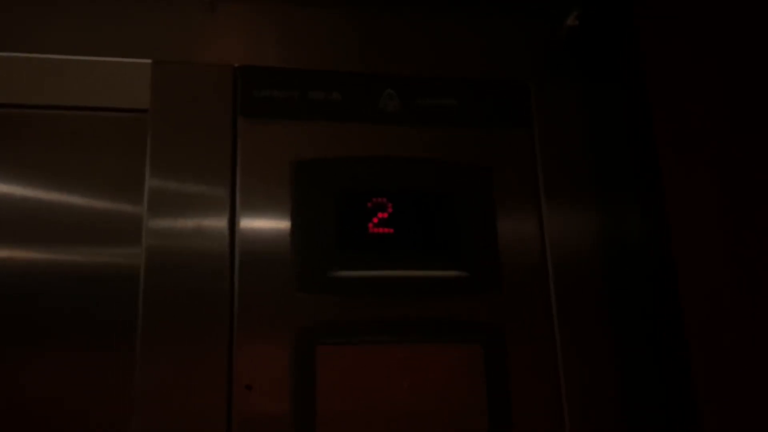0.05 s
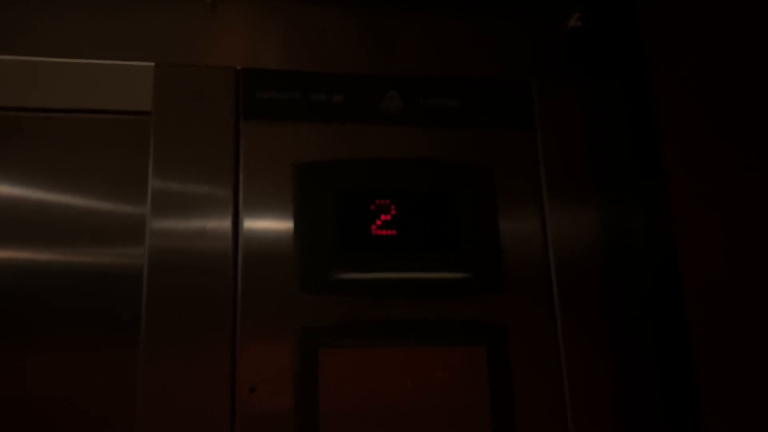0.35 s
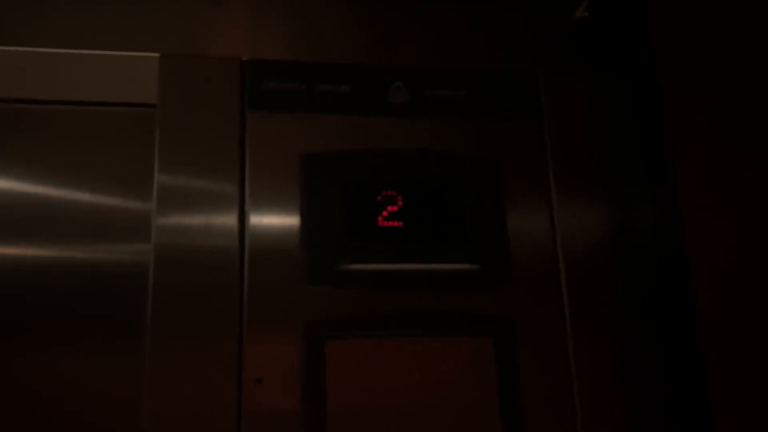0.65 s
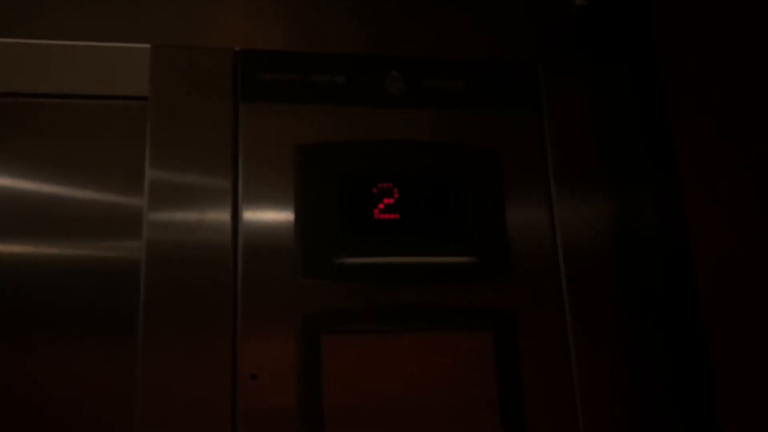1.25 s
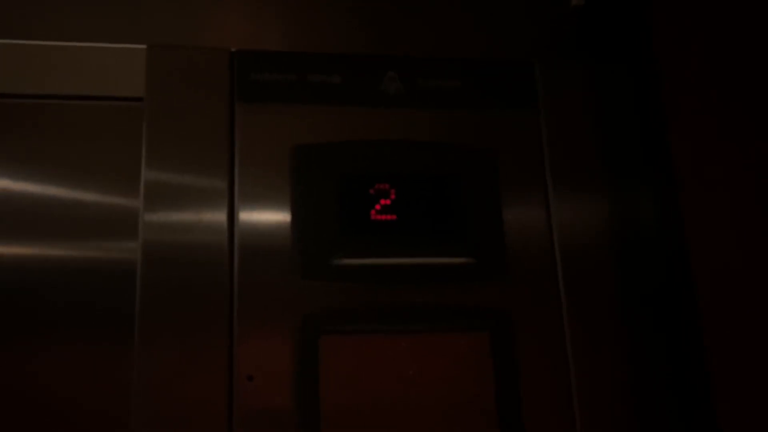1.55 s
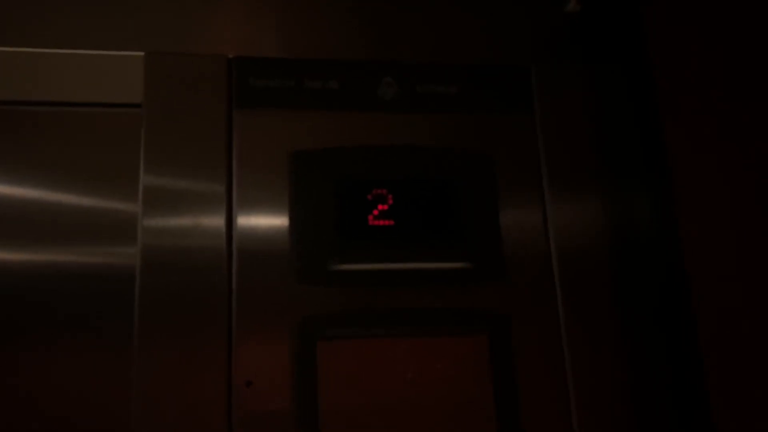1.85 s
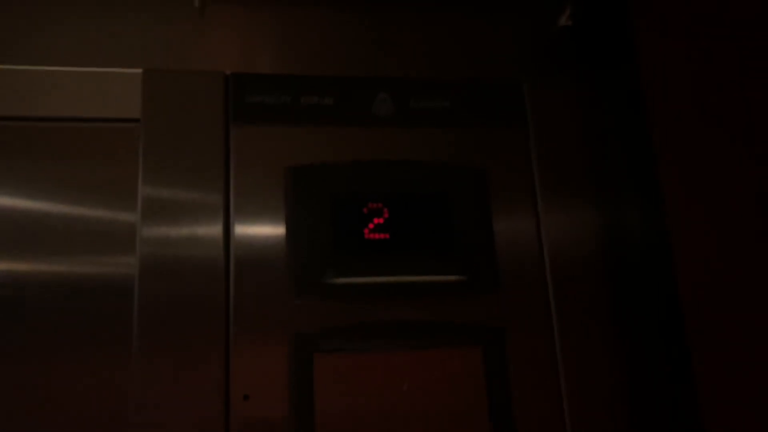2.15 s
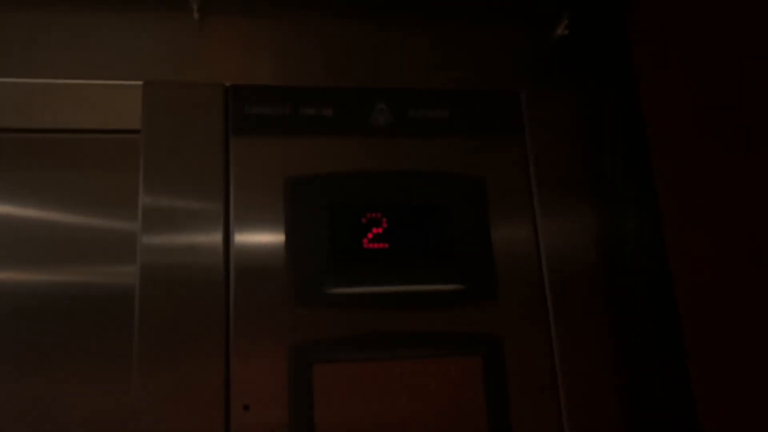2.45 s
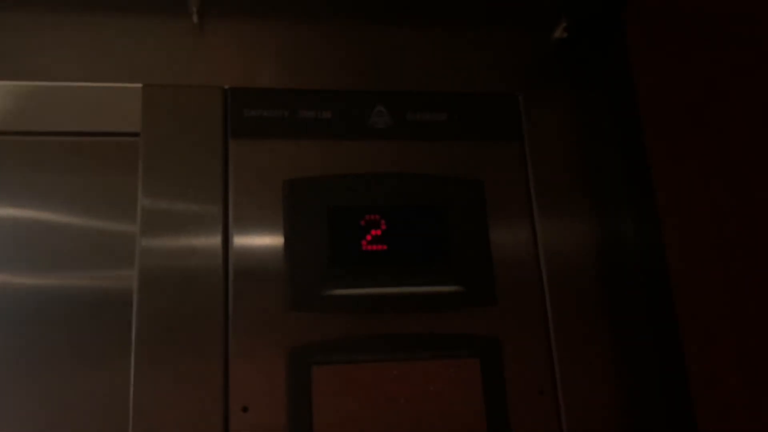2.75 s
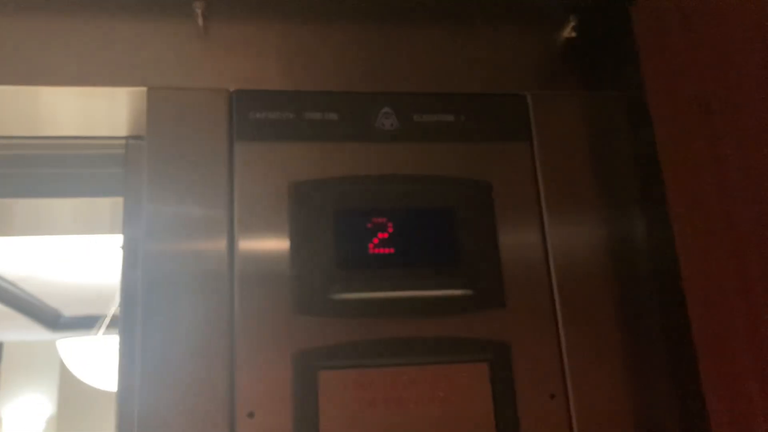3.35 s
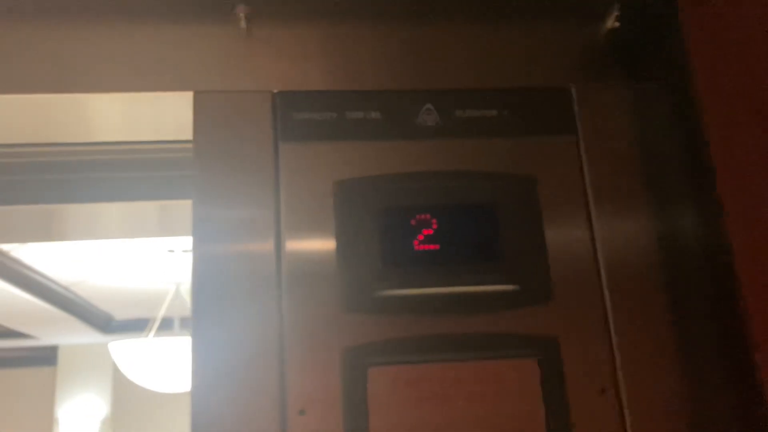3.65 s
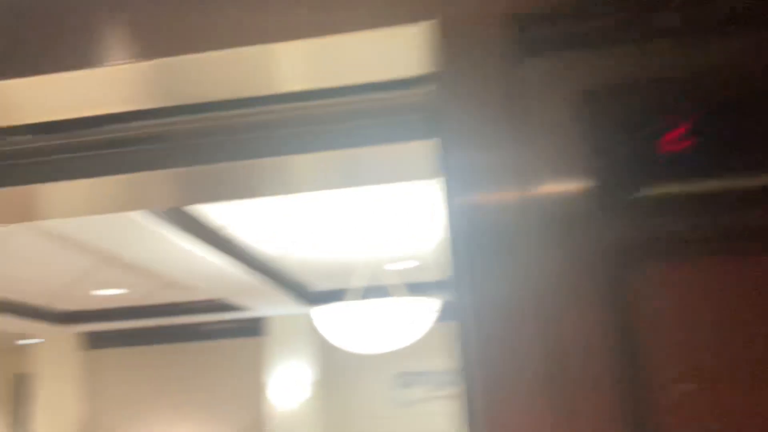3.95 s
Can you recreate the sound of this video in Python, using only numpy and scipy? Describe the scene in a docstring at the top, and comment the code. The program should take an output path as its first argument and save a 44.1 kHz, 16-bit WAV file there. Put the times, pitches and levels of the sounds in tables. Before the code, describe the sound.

An elevator door slides open, heard from inside a small steel cab. A fan drones throughout under a thin, high electronic whine. Around 1.5 seconds a low hum fades and the rollers start rumbling, followed by a squeak and a latch clunk near 1.9. From 2 seconds the motor whirrs up, then down, with hissing guides and small squeaks, ending in a low groan around 3.5.

```python
"""A fan drones close by, heard from a stereo microphone inside a small steel elevator cab.
Under it sits a thin, high electronic whine, and a mains hum dies away as the car settles.
The door drive starts, a squeak and a latch clunk follow, and the door rolls open:
its rollers rumble, its guides hiss and the drive whirrs up and down with the speed,
ending in a low groan. The steel walls add narrow resonances and spread the sound."""
import sys
import numpy as np
from scipy import signal
from scipy.fft import rfft, irfft
from scipy.io import wavfile
from scipy.ndimage import uniform_filter1d

SR = 44100
rng = np.random.default_rng(int(sys.argv[2]) if len(sys.argv) > 2 else 0)


def digitize_waveform(pressure):
    """Quantize a signal to 16-bit integers and store it at the path in sys.argv[1].

    Rows of a 2-D input are taken as channels; values are limited to [-1, 1].
    """
    field = np.atleast_2d(pressure).T
    bounded = np.clip(field, -1, 1)
    quanta = np.round(bounded * 32767).astype(np.int16)
    wavfile.write(sys.argv[1], SR, quanta)


N = 176400
T = np.arange(N) / SR
HZ = np.fft.rfftfreq(N, 1 / SR)


def amp(db):
    """Decibels to gain."""
    return 10 ** (np.asarray(db) / 20)


def unit(x):
    """Scales to rms 1."""
    return x / np.sqrt(np.mean(x ** 2) + 1e-20)


def curve(rows, column=1):
    """Reads a column of a time table at every sample."""
    rows = np.array(rows)
    return np.interp(T, rows[:, 0], rows[:, column])


def spectrum(rows):
    """Reads a frequency table on a log axis."""
    f, value = np.transpose(rows)
    return np.interp(np.log(HZ + 1), np.log(f + 1), value)


def wander(rate_hz):
    """Slow random drift of rms 1."""
    return unit(irfft(rfft(rng.standard_normal(N)) / (1 + (HZ / rate_hz) ** 4), N))


def burst(start, rise, t60):
    """An envelope with a linear rise and an exponential decay; times in seconds."""
    age = np.maximum(T - start, 0)
    return np.minimum(age / rise, 1) * amp(-60 * np.maximum(age - rise, 0) / t60)


def ripple(depth_db=2.5, width_hz=14, full_from_hz=534):
    """The steel cab's many narrow peaks and dips, as a gain by frequency."""
    peaks = np.interp(HZ / width_hz, np.arange(4096), rng.uniform(-1, 1, 4096))
    return amp(depth_db * unit(peaks) * np.minimum(HZ / full_from_hz, 1) ** 2)


def diffuse(gain, excitation=None):
    """Colours two random signals and blends them as the cab's reflections do at the microphone."""
    # how alike left and right are: f/Hz, likeness (a correlation once clipped to +-1)
    likeness = [(60, 0.5), (120, 1.45), (200, 0.8), (370, 0.84), (690, 0.58), (1270, 0), (4300, 0),
                (5500, -0.42), (7200, 0.87), (9200, -1.55), (11300, 1.54), (13500, -1)]
    correlation = np.clip(spectrum(likeness), -1, 1)
    a, b = rfft(rng.standard_normal((2, N)) if excitation is None else excitation)
    mid, side = a * np.sqrt(1 + correlation), b * np.sqrt(1 - correlation)
    return unit(irfft(np.array([mid + side, mid - side]) * gain, N))


def ring(hz, width_hz):
    """Noise in one steep resonance."""
    return diffuse(1 / (1 + ((HZ - hz) / (width_hz / 1.42)) ** 2))


def glide(rows, width_hz, multiple=1):
    """A rough tone that follows rows of t/s, f/Hz, level/dB."""
    band = rfft(rng.standard_normal((2, 2, N))) / (1 + (HZ / (width_hz / 2.4)) ** 2)
    a, b = irfft(band, N)
    phase = 2 * np.pi * np.cumsum(curve(rows) * multiple) / SR
    gate = uniform_filter1d(1. * ((T > rows[0][0]) & (T < rows[-1][0])), size=900)
    return unit(a * np.cos(phase) + b * np.sin(phase)) * amp(curve(rows, column=2)) * gate


def shimmer(x, patchy_db):
    """Narrow resonances come and go as the contact point moves."""
    frames = signal.stft(x, nperseg=1024, noverlap=768)[2]
    patches = rng.standard_normal(frames.shape[1:])
    patches = uniform_filter1d(uniform_filter1d(patches, size=4, axis=0), size=18, axis=1)
    frames *= amp(patchy_db * unit(patches))
    return unit(signal.istft(frames, nperseg=1024, noverlap=768)[1][:, :N])


def fan(waver_db=1.4, air_db=-35):
    """The cab's room tone: the fan's drone, the resonances it stirs, and its rush of air."""
    # the drone's strength: t/s, level/dB
    drone_level = [(0, -27), (.25, -22), (.85, -21), (1.17, -22), (1.3, -26.5), (1.85, -28), (2.3, -27.5),
                   (2.55, -21.5), (2.95, -27), (3.25, -24), (3.75, -27), (4, -38)]
    # the drone's pitch: t/s, f/Hz
    drone_pitch = [(0, 76.2), (1.5, 76.4), (1.9, 77.46), (4, 77)]
    # cab resonances: f/Hz, width/Hz, level/dB
    cab_rings = [(97.4, 13.4, -35.5), (122.4, 10.2, -34), (165.7, 9, -46.5), (192.4, 5.6, -46),
                 (238.4, 3.7, -48.5), (341.2, 11.8, -44.5), (400.7, 5.9, -52), (575, 7.6, -56),
                 (638, 10, -55.5), (943, 45, -67.5)]
    # moving air: f/Hz, relative level/dB
    air_colour = [(20, -10), (45, 5.5), (100, 4), (150, -5.5), (300, -3), (430, -4.5), (700, -10),
                  (1100, -13), (1800, -19), (2700, -22.5), (3800, -33), (5500, -41), (11500, -50.5),
                  (14000, -62.5)]
    phase = 2 * np.pi * np.cumsum(curve(drone_pitch)) / SR
    drone = np.sqrt(2) * np.sin(phase) * amp(curve(drone_level) + waver_db * wander(14))
    rings = sum(amp(db) * ring(hz, width) for hz, width, db in cab_rings)
    air = amp(air_db) * diffuse(amp(spectrum(air_colour)) * ripple())
    return drone + rings + air


def electrics(hum_hz=58, hum_db=-33, off_s=1.6, fade_s=0.24, whine_hz=15001, random_level_db=2.5):
    """Mains hum that dies as the car settles, and a thin, high electronic whine."""
    # electronic whine: t/s, level/dB
    whine_level = [(0, -61), (.58, -61), (.72, -71), (1.04, -65), (1.22, -70), (2.64, -72), (3.25, -63),
                   (4, -64)]
    fade = np.clip(1 - (T - off_s) / fade_s, 0, 1)
    hum = amp(hum_db) * fade * np.sin(2 * np.pi * hum_hz * T)
    lag_rad = np.array([[0], [1.15]])  # left, right
    whine = np.sin(2 * np.pi * whine_hz * T - lag_rad)
    whine *= amp(curve(whine_level) + random_level_db * wander(25))
    return np.sqrt(2) * (hum + whine)


def latch(puff_db=-56.5, bloom_cycles=9.2, thud_s=1.929, thud_hz=83.2, thud_db=-17):
    """A soft hiss, then the latch clacks, its low modes bloom and the door panel booms as it moves."""
    # the soft hiss: f/Hz, relative level/dB
    puff_colour = [(1000, -11), (5000, 3), (11500, 0), (14500, -12)]
    # latch blows: t/s, level/dB
    blows = [(1.849, -35.5), (1.861, -39.5), (1.876, -41)]
    # their clatter: f/Hz, relative level/dB
    clatter_colour = [(150, 2), (1500, -1), (3000, -2), (4900, -11), (5800, -21), (10800, -18.5),
                      (13000, -50)]
    # the modes they ring: f/Hz, level/dB relative to the blow, t60/s
    modes = [(194, 0, 0.81), (265, -1, 0.91), (623, 3.5, 0.34), (960, -3.5, 0.76), (1160, -6.5, 0.37),
             (1920, -10.5, 0.45), (2660, -15, 0.23), (3050, -11.5, 0.59), (4520, -8.5, 0.13)]

    def struck(rise, t60):
        """The envelope of all the blows, added in power."""
        return np.sqrt(sum((amp(db) * burst(start, rise, t60)) ** 2 for start, db in blows))

    puff = amp(puff_db) * burst(start=1.435, rise=0.019, t60=0.43) * diffuse(amp(spectrum(puff_colour)))
    clatter = diffuse(amp(spectrum(clatter_colour)) * ripple()) * struck(rise=0.0025, t60=0.37)
    body = sum(amp(db) * ring(hz, 0.05 * hz) * struck(bloom_cycles / hz, t60) for hz, db, t60 in modes)
    thud = amp(thud_db) * burst(thud_s, rise=0.04, t60=0.4) * np.sin(2 * np.pi * thud_hz * (T - thud_s))
    return puff + clatter + body + thud


def squeaks(rise_s=0.02, width_hz=160):
    """Dry metal parts chirp and ring on."""
    # squeaks: t/s, f/Hz, level/dB, t60/s, phase between left and right/rad
    chirps = [(1.742, 8620, -38.5, 0.27, 2.6), (2.328, 7130, -42.5, 0.36, 1.3), (2.92, 2010, -45, 0.25, 1),
              (2.98, 1740, -40.5, 0.3, 1)]
    out = np.zeros((2, N))
    for start, hz, db, t60, phase in chirps:
        tone = signal.hilbert(ring(hz, width_hz)[0])
        pair = np.array([tone, tone * np.exp(1j * phase)]).real
        out += amp(db) * burst(start, rise_s, t60) * pair
    return out


def rollers():
    """The door's rollers rumble along their track, a step from the microphone."""
    # the rumble's course: t/s, level/dB
    level = [(1.35, -53), (1.53, -36), (1.83, -48.5), (1.98, -35.5), (2.25, -37.5), (2.42, -45.5),
             (3.1, -51.5), (3.3, -55), (3.6, -45), (4, -50)]
    # its colour: f/Hz, relative level/dB
    colour = [(60, -32), (190, -1), (300, -6), (440, -2), (620, -4), (820, -17.5), (1500, -18), (3000, -30),
              (8000, -52)]
    return amp(curve(level)) * diffuse(amp(spectrum(colour)) * ripple())


def guides(grit_per_s=1000, grit_spread_db=5.5, grit_share=0.49, flutter_db=1.54):
    """The door's guides rub along a gritty track; a falling sweep follows as the door brakes."""
    # the rubbing's course: t/s, level/dB
    level = [(1.8, -64), (2, -57), (2.2, -49.5), (2.5, -49.5), (2.7, -54), (2.85, -48.5), (2.92, -40),
             (3.0, -40), (3.12, -40.5), (3.22, -46.5), (3.5, -47.5), (3.66, -48.5), (3.77, -57), (4, -54.5)]
    # its colour: f/Hz, relative level/dB
    colour = [(300, -30), (1300, 1), (2300, -3.5), (2720, 4), (3300, 1.5), (5100, 2), (7100, 0.5),
              (8200, -2), (12300, -13.5), (15500, -17)]
    # the last sweep: t/s, f/Hz, level/dB
    sweep = [(3.55, 5540, -56), (3.72, 4810, -54), (3.85, 3990, -51), (4, 3480, -69)]
    grit = (rng.random((2, N)) < grit_per_s / SR) * rng.choice([-1, 1], (2, N))
    grit = grit * amp(grit_spread_db * np.minimum(rng.exponential(1, (2, N)), 4))
    response = amp(spectrum(colour)) * ripple()
    friction = rng.standard_normal((2, N)) + grit_share * unit(grit)
    rub = shimmer(diffuse(response, friction), patchy_db=3.5)
    envelope = amp(curve(level) + flutter_db * wander(13)) * (T > level[0][0])
    return rub * envelope + glide(sweep, width_hz=1300)


def drive(width_hz=240, overtone_ratio=2.07, overtone_db=-12, rough_db=2.0, groan_blend=0.54):
    """The door's motor and belt whirr with an overtone, rising, falling and ending in a groan."""
    # the whirr speeding up: t/s, f/Hz, level/dB
    rising = [(1.95, 2160, -62), (2.14, 2271, -54), (2.2, 2307, -47), (2.33, 2486, -53), (2.42, 2753, -45),
              (2.52, 2950, -40), (2.6, 3070, -42.5), (2.67, 3170, -51), (2.76, 3300, -64)]
    # the whirr slowing down: t/s, f/Hz, level/dB
    falling = [(2.728, 2100, -70), (2.81, 1995, -43.5), (2.88, 2002, -57.5), (2.941, 1995, -51.5),
               (3.01, 1730, -55.5), (3.15, 1435, -51), (3.319, 1262, -50.5), (3.45, 1087, -65)]
    # the low groan as the door brakes: t/s, f/Hz, level/dB
    braking = [(3.28, 637.6, -60), (3.39, 610, -40.5), (3.48, 595, -41), (3.62, 567.6, -50.5),
               (3.85, 511, -45)]
    whirr = np.zeros((2, N))
    for run in (rising, falling):
        whirr += glide(run, width_hz) + amp(overtone_db) * glide(run, 3 * width_hz, overtone_ratio)
    whirr *= amp(rough_db * wander(25))
    whirr = irfft(rfft(whirr) * ripple(), N)
    groan = glide(braking, width_hz=106)
    return whirr + groan + groan_blend * groan[::-1]  # each side also hears the other's groan


def panels(width_hz=40, swell_s=0.068):
    """The steel panels around the microphone sing along as the drive starts and brakes."""
    # swelling panel resonances: t/s, f/Hz, level/dB
    swells = [(1.53, 582, -40), (1.59, 378, -34), (1.68, 950, -45.5), (2.07, 512, -44), (2.24, 435, -42),
              (3.62, 423, -38)]
    return sum(amp(db) * np.exp(-((T - peak_s) / swell_s) ** 2) * ring(hz, width_hz)
               for peak_s, hz, db in swells)


def scene():
    """Everything heard from inside the cab."""
    return fan() + electrics() + latch() + squeaks() + rollers() + guides() + drive() + panels()


def record(dry, edge_hz=15600):
    """The stereo microphone: the balance shifts with frequency and the top treble is cut off."""
    # channel balance: f/Hz, left minus right level/dB
    balance = [(60, -2), (200, -3.5), (370, 1.5), (690, -0.5), (1270, 2), (2300, -0.5), (8000, 0)]
    tilt = amp(np.array([[.5], [-.5]]) * spectrum(balance))
    heard = irfft(rfft(dry) * tilt, N)
    band_limit = signal.firwin(511, edge_hz, window=("kaiser", 9), fs=SR)
    return signal.oaconvolve(heard, band_limit[None], "same")


dry = scene()
out = record(dry)
digitize_waveform(out)
```